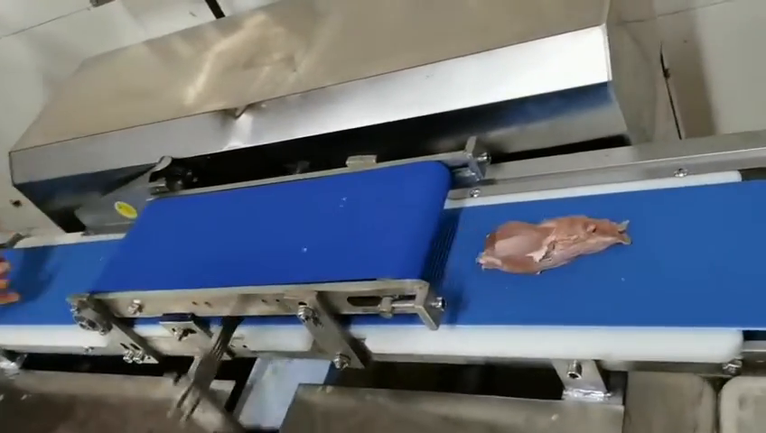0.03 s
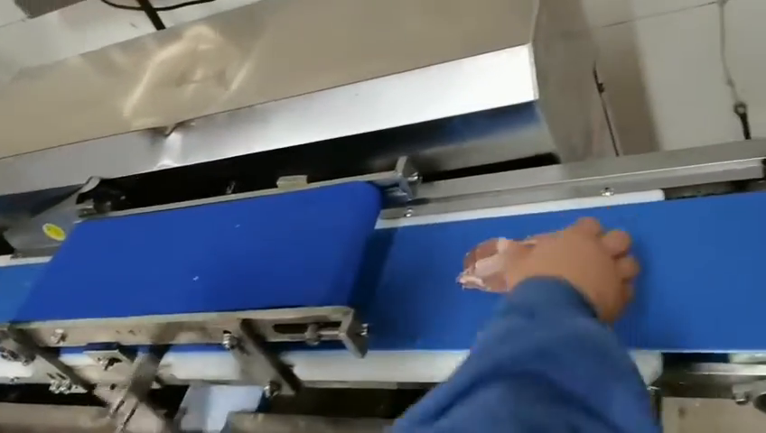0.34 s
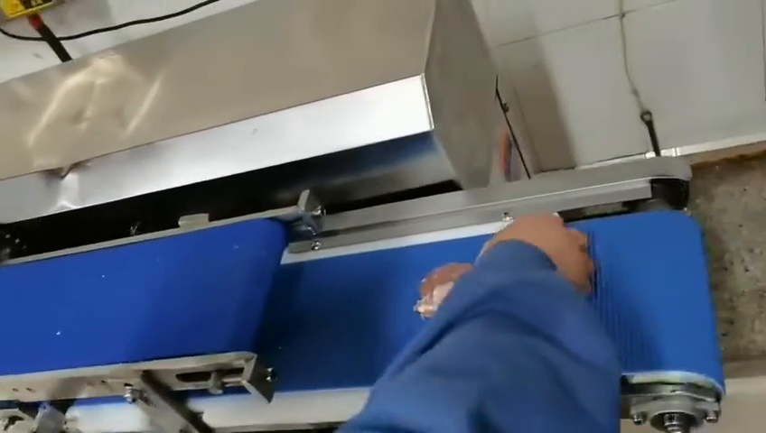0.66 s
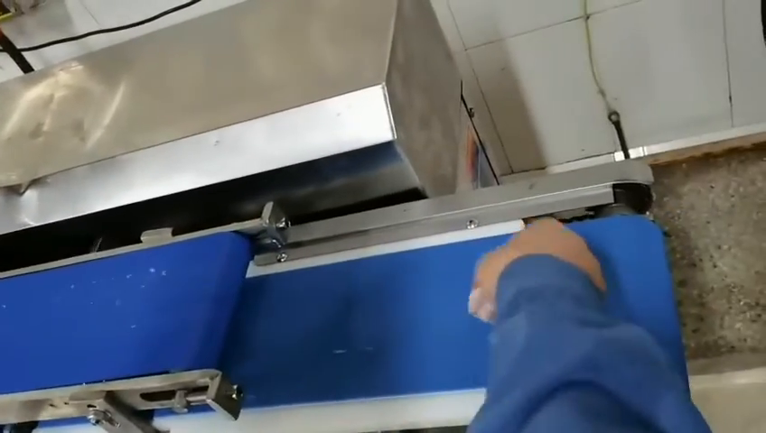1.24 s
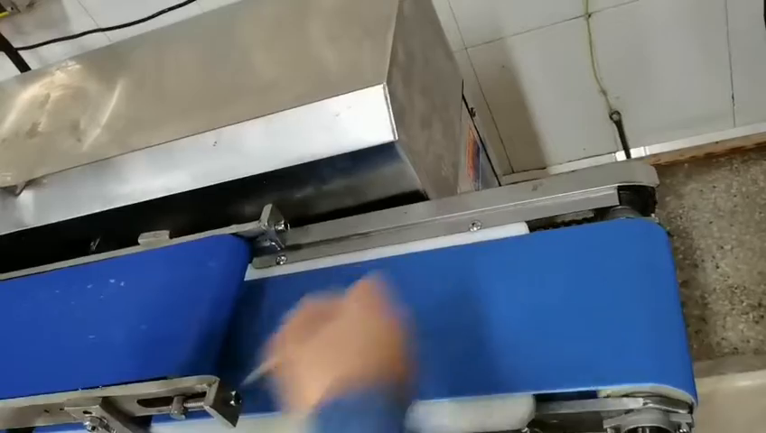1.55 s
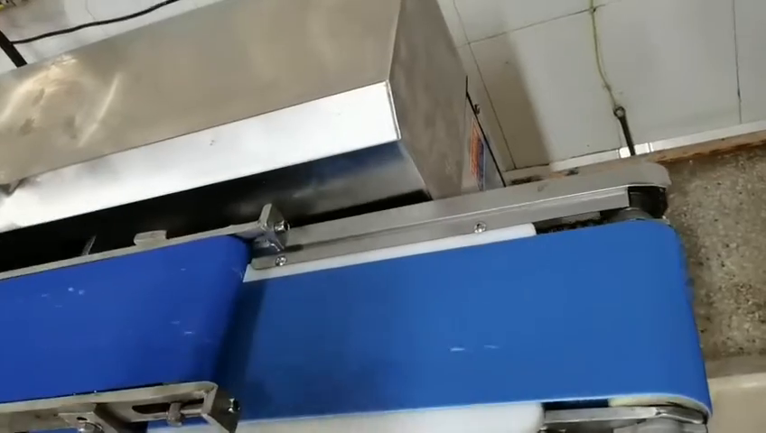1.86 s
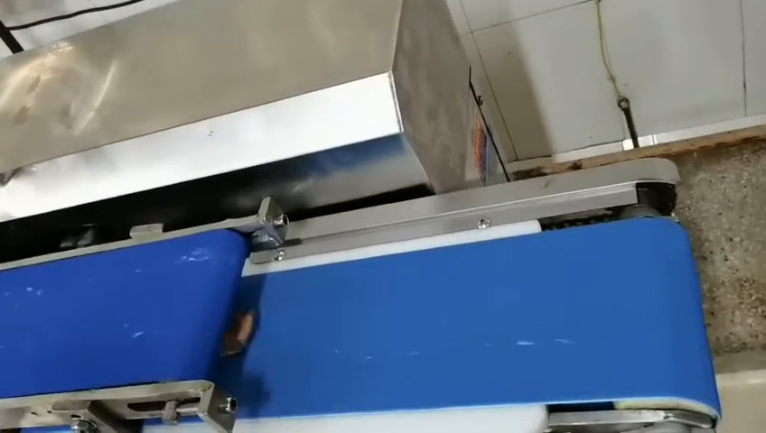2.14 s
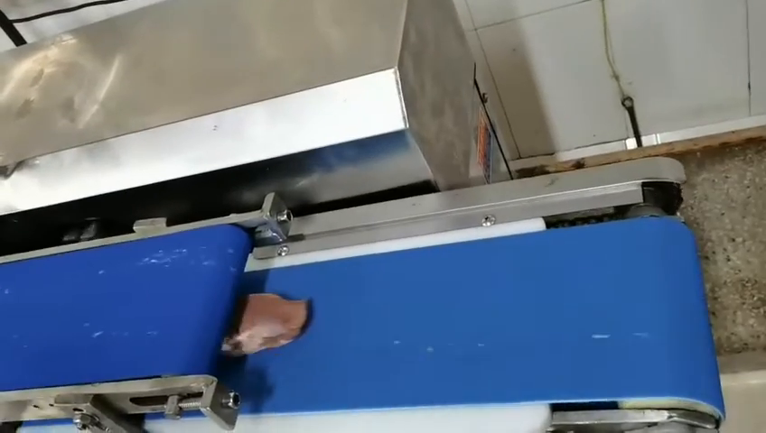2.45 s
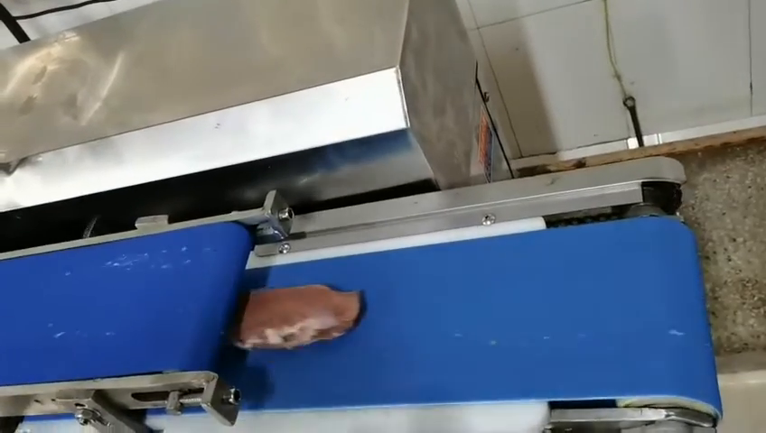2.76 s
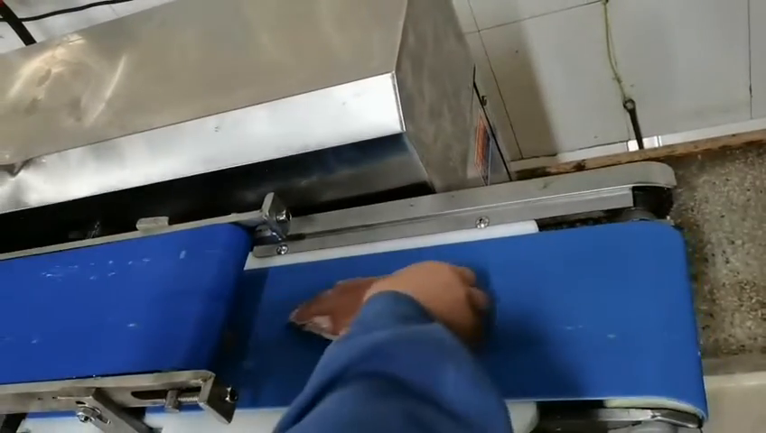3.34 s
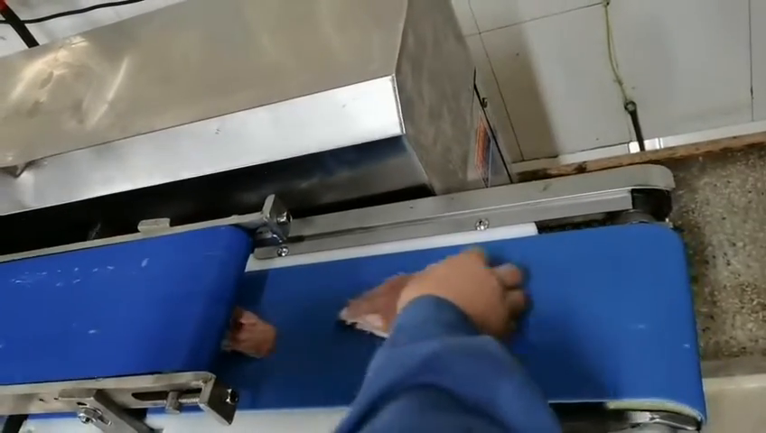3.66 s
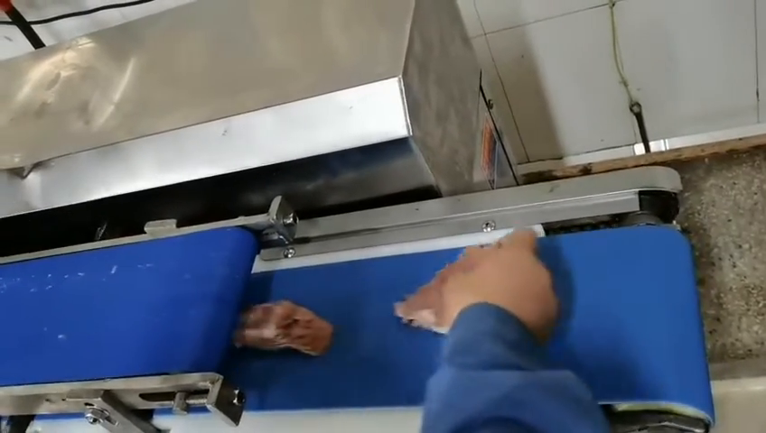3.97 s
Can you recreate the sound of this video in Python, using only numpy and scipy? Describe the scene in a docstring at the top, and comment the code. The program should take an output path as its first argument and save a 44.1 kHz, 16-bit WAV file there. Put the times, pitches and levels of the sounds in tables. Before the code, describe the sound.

A meat slicing machine throbs and rasps in a fast rhythm, with conveyor hiss and squeaks.

```python
"""A tiled workroom, heard close up in mono: a meat slicer runs steadily beside its conveyor.
Underneath, the motor hums, the gears whine thinly and the belt hisses. A crank drives the blades out
and back about six times a second: the frame throbs and knocks, and the blades rasp, ring in their
guides and squeak now and then. The sound stops dead shortly before the end."""
import sys
import numpy as np
from scipy import signal
from scipy.io import wavfile

SR = 44100
rng = np.random.default_rng(int(sys.argv[2]) if len(sys.argv) > 2 else 0)


def master_out(mix):
    """Clip the mix to full scale and print it as 16-bit PCM to the path in sys.argv[1]."""
    frames = np.transpose(np.atleast_2d(mix))
    ceiling = np.clip(frames, -1, 1)
    pcm = np.round(ceiling * 32767).astype(np.int16)
    wavfile.write(sys.argv[1], SR, pcm)


N = 176400
TIME = np.arange(N) / SR
CRANK_HZ, STOP_S = 5.86, 3.795
TURN = CRANK_HZ * TIME


def from_db(db):
    """Decibels to gain."""
    return 10 ** (np.asarray(db) / 20)

def unit_rms(x):
    """Scale to rms 1."""
    return x / np.sqrt(np.mean(x ** 2) + 1e-20)

def drift(rate_hz):
    """A smooth random modulator, rms about 1."""
    step, run_in = 40, 2000
    pole = np.exp(-2 * np.pi * rate_hz * step / SR)
    noise = rng.standard_normal(N // step + run_in + 2)
    slow = signal.lfilter([1], [1, -2 * pole, pole * pole], noise)[run_in:]
    return np.interp(np.arange(N) / step, np.arange(len(slow)), unit_rms(slow))

def swell(at, width, clock=TIME):
    """A bell-shaped envelope."""
    return np.exp(-.5 * ((clock - at) / width) ** 2)

def crank_pulse(rows):
    """A gain that swells at the same places in every turn; rms 1."""
    rise_db = sum(db * swell(.5, width, (TURN - at + .5) % 1) for at, width, db in rows)
    return unit_rms(from_db(rise_db))

def tone(hz, db, waver_db, slip_rad):
    """A sine that wavers in level and phase."""
    gain = from_db(waver_db * drift(3.6))
    phase = 2 * np.pi * (hz * TIME + rng.random()) + slip_rad * drift(1.8)
    return from_db(db) * unit_rms(gain * np.sin(phase))

def friction(slips_per_s=3500, grit=.36):
    """Smooth noise roughened by tiny slips of uneven size."""
    slips = (rng.random(N) < slips_per_s / SR) * rng.choice([-1, 1], N)
    slips = slips * from_db(2.5 * np.minimum(rng.exponential(1, N), 5))
    return np.sqrt(1 - grit) * rng.standard_normal(N) + np.sqrt(grit) * unit_rms(slips)

def housed_friction(longest_s=.02, echo_db=-10):
    """Friction, comb-filtered by quick reflections off the steel panels."""
    direct = friction()
    lags = (rng.uniform(.1, 1, 12) * longest_s * SR).astype(int)
    echoes = sum(np.roll(direct, lag) * (-1) ** k for k, lag in enumerate(lags))
    return direct + from_db(echo_db) * unit_rms(echoes)

def flicker_eq(curve, noises, depth_db, rate_hz):
    """Two noises feed alternate third-octave bands, each flickering on its own; rms 1."""
    hz, db = np.transpose(curve)
    edges, mix = 22 * 2 ** (np.arange(30) / 3), 0
    for k, (low, high) in enumerate(zip(edges, edges[1:])):
        centre = np.sqrt(low * high)
        band_db = np.interp(np.log(centre), np.log(hz), db) + depth_db * drift(rate_hz)
        if high > hz[0] and low < hz[-1]:
            bandpass = signal.butter(2, [low, high], "band", fs=SR, output="sos")
            mix = mix + from_db(band_db) * signal.sosfilt(bandpass, noises[k % 2])
    return unit_rms(mix)


# hum and whine partials: (pitch [Hz], level [dB])
MOTOR_TONES = [(107.2, -45), (320, -52), (2654, -61.5), (3002, -64.5), (5916, -65), (6121, -67)]
def motor():
    """The bed: low motor hum under a thin, unsteady gear whine."""
    return sum(tone(hz, db, waver_db=2.5, slip_rad=1.2 if hz > 1000 else .6) for hz, db in MOTOR_TONES)


# bright hiss: (frequency [Hz], gain [dB])
BELT_EQ = [(1500, -10), (3000, -7.5), (4200, -1), (5000, -1.5), (6000, 1), (6900, -3), (7600, -6),
           (9500, -8), (11000, -11.5), (12500, -12.5), (14000, -19)]
# slow level ride: (time [s], gain [dB])
BELT_RIDE = [(0, -2.5), (.35, -0.9), (.65, -1.5), (1.0, -.5), (1.5, -0.9), (2.1, 1), (2.4, -0.9),
             (3.15, 0.5), (3.42, -2), (3.78, 0.5)]
# harder rubs: (time [s], rise [dB], width [s])
BELT_SCRAPES = [(.355, 2, .022), (.805, 3.5, .014), (1.195, 2, .02), (1.38, 3, .02), (1.53, 2.5, .025),
                (1.75, 3, .012), (2.22, 4.5, .017), (2.52, 4, .016), (2.595, 1.5, .014), (2.775, 1, .012),
                (2.905, 3.5, .02), (3.078, 4, .021), (3.61, 3.5, .02), (3.752, 3, .018)]
# hiss accents: (position [turns], width [turns], rise [dB])
BELT_PULSE = [(.15, 0.11, 1.9), (.67, .12, 2.2), (.96, 0.021, 2.2)]
def belt():
    """The belt rubs and hisses, pulsing with the crank and flaring in short scrapes."""
    level_db = -42.5 + np.interp(TIME, *np.transpose(BELT_RIDE)) + .5 * drift(40)
    level_db += sum(db * swell(at, width) for at, db, width in BELT_SCRAPES)
    hiss = flicker_eq(BELT_EQ, [housed_friction(), housed_friction()], depth_db=1.6, rate_hz=21)
    return from_db(level_db) * crank_pulse(BELT_PULSE) * hiss


# panel partials: (harmonic [x crank rate], level [dB])
PANEL_HARMONICS = [(18, -46), (20, -42.5), (22, -52.5), (23, -48), (24, -55), (27, -59), (29, -54),
                   (32, -45), (33, -50), (34, -57), (35, -44), (36, -54), (37, -46.5), (38, -59),
                   (44, -59.5), (59, -50)]
def panel_drone():
    """The steel panels drone on harmonics of the crank."""
    return sum(tone(k * CRANK_HZ, db, waver_db=3, slip_rad=.27) for k, db in PANEL_HARMONICS)


# deep shake: (harmonic [x crank rate], level [dB])
SHAKE_HARMONICS = [(10, -45.5), (13, -46), (14, -58)]
# low-end weight: (frequency [Hz], gain [dB])
RUMBLE_EQ = [(25, -29), (45, -19), (60, -4), (90, -13), (108, 4), (130, -3), (150, -22), (200, -43)]
# shake and rumble accents: (position [turns], width [turns], rise [dB])
SHAKE_PULSE = [(.17, 0.14, 6), (.53, 0.21, 3)]
RUMBLE_PULSE = [(.28, 0.067, 3.6), (.7, 0.091, 3.3), (.99, 0.046, 2.4)]
def frame_throb(peak_turn=.2):
    """The crank shakes the frame: low partials line up once a turn over a pulsing rumble."""
    angle = 2 * np.pi * (TURN - peak_turn)
    shake = sum(from_db(db) * np.sqrt(2) * np.cos(k * angle) for k, db in SHAKE_HARMONICS)
    rumble = flicker_eq(RUMBLE_EQ, rng.standard_normal((2, N)), depth_db=.5, rate_hz=11)
    return crank_pulse(SHAKE_PULSE) * shake + from_db(-42) * crank_pulse(RUMBLE_PULSE) * rumble


# dull body of the knocks: (frequency [Hz], gain [dB])
KNOCK_EQ = [(110, -33.5), (160, -2), (205, 2.5), (260, -1.5), (310, 1.5), (380, -5.5), (450, -20.5),
            (700, -24.5)]
# knock accents: (position [turns], width [turns], rise [dB])
KNOCK_PULSE = [(.17, 0.11, 2), (.78, 0.057, 3.4), (.98, 0.034, 1.4)]
# heavier hits: (time [s], boom level [dB], knock gain [dB])
FRAME_THUMPS = [(.07, -31, 1), (0.146, -29, 4), (.518, -31.5, -4), (.565, -30, 4.5), (0.789, -27.5, 3.5),
                (.981, -37, 0), (1.182, -27.5, 3.5), (1.325, -45, 4), (1.359, -26, 2), (1.528, -30.5, 0.5),
                (1.611, -33, -1), (1.765, -33, 5.5), (1.819, -24.5, 0), (1.912, -27, 6), (2.083, -48, 3),
                (2.35, -29.5, 4), (2.425, -25.5, 3.5), (2.597, -30, 5), (2.746, -41.5, 6.5),
                (2.858, -27.5, 1), (2.948, -26, 0.5), (3.074, -32, -1), (3.277, -26, 2.5),
                (3.418, -28.5, 5.5), (3.45, -38, 2.5), (3.552, -30.5, 3.5), (3.63, -28, 4.5)]
def frame_knocks(boom_hz=(98, 134)):
    """The frame knocks in its joints; the heavier hits carry a low boom."""
    booms, level_db = 0, -35.5
    for at, boom_db, knock_db in FRAME_THUMPS:
        cycles = rng.uniform(*boom_hz) * (TIME - at) + rng.random()
        booms += from_db(boom_db) * swell(at, .013) * np.sin(2 * np.pi * cycles)
        level_db += knock_db * swell(at, .012)
    body = flicker_eq(KNOCK_EQ, rng.standard_normal((2, N)), depth_db=1.5, rate_hz=2.9)
    return booms + from_db(level_db) * crank_pulse(KNOCK_PULSE) * body


# blade and guide resonances: (pitch [Hz], bandwidth [Hz], level [dB])
RING_MODES = [(505, 17, -51), (634, 40, -59.5), (789, 42, -53), (1035, 45, -62.5), (1270, 34.3, -49.5),
              (1355, 35, -55.5), (2466, 40, -55.5), (2687, 45, -56), (2757, 110, -55.5), (3340, 29, -68),
              (4140, 44, -81), (5650, 20, -70.5), (5810, 82, -58), (6500, 56, -77), (7000, 37, -70)]
# ring accents: (position [turns], width [turns], rise [dB])
RING_PULSE = [(.18, 0.11, 5.1), (.55, 0.082, 4.6)]
def blade_ring():
    """Friction sets the blades and their guides ringing, twice a turn."""
    ring = 0
    for hz, width_hz, db in RING_MODES:
        radius = np.exp(-np.pi * width_hz / SR)
        resonator = [1, -2 * radius * np.cos(2 * np.pi * hz / SR), radius ** 2]
        ring += from_db(db) * unit_rms(signal.lfilter([1, 0, -1], resonator, friction()))
    return ring * crank_pulse(RING_PULSE)


# short squeals: (time [s], pitch [Hz], level [dB], width [s])
BLADE_SQUEAKS = [(.372, 1285, -37.5, .016), (.605, 1320, -40, .01), (.805, 5920, -41, .011),
                 (.878, 1290, -34.5, .01), (1.11, 1280, -40.5, .02), (1.455, 2655, -41.5, .014),
                 (1.574, 1260, -40.5, .02), (1.74, 1270, -36, .026), (2.247, 1265, -38.5, .014),
                 (2.593, 1270, -40, .015), (3.08, 6280, -43, .014), (3.676, 1280, -42, .012)]
def blade_squeaks(pitch_waver=.009):
    """A blade catches and sings briefly on an unsteady pitch."""
    wavering_time = TIME + pitch_waver * np.cumsum(drift(60)) / SR
    return sum(from_db(db) * swell(at, width) * np.sin(2 * np.pi * hz * wavering_time)
               for at, hz, db, width in BLADE_SQUEAKS)


# gritty midrange: (frequency [Hz], gain [dB])
RASP_EQ = [(300, 0), (500, -3.5), (620, -6), (800, -1.5), (1100, -4.5), (1700, -6.5), (2100, -6.5),
           (2600, -8), (3800, -8.5), (6000, -25.5), (13000, -51)]
# level ride: (time [s], gain [dB])
RASP_RIDE = [(0, 1.5), (.3, -.5), (.8, -0.05), (1.7, 0), (2.6, 1), (3.2, 1), (3.47, -2), (3.52, 3.5),
             (3.62, 0.5), (3.78, -1)]
# out and back strokes: (position [turns], width [turns], rise [dB])
RASP_PULSE = [(.17, 0.11, 2.26), (.61, 0.1, 2.8)]
def blade_rasp():
    """The sliding blades rasp once on the way out and once on the way back."""
    level_db = -37.5 + np.interp(TIME, *np.transpose(RASP_RIDE)) + .5 * drift(24)
    rasp = flicker_eq(RASP_EQ, [housed_friction(), housed_friction()], depth_db=1.6, rate_hz=16)
    return from_db(level_db) * crank_pulse(RASP_PULSE) * rasp


def scene():
    """The whole machine, alike in both channels."""
    frame = panel_drone() + frame_throb() + frame_knocks()
    blades = blade_ring() + blade_squeaks() + blade_rasp()
    return np.tile(motor() + belt() + frame + blades, (2, 1))

def record(dry):
    """A hard stop with a 2 ms fade, then a steep high cut at 14 kHz."""
    gate = np.clip((STOP_S - TIME) / .002, 0, 1)
    high_cut = signal.ellip(12, .2, 80, 14000, fs=SR, output="sos")
    return signal.sosfilt(high_cut, dry * gate + 1e-18)


dry = scene()
out = record(dry)
master_out(out)
```